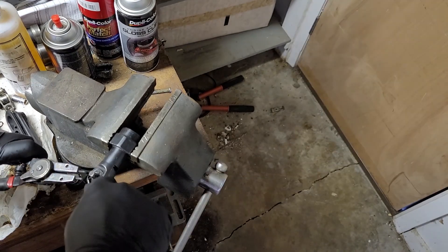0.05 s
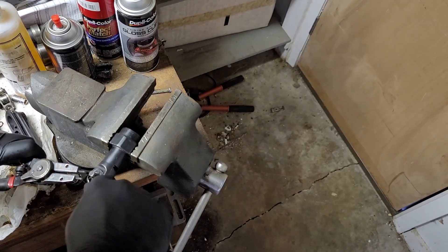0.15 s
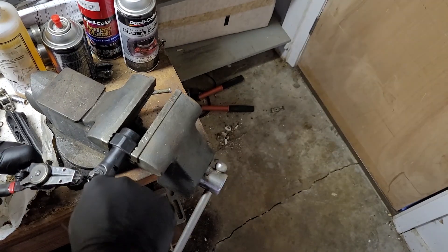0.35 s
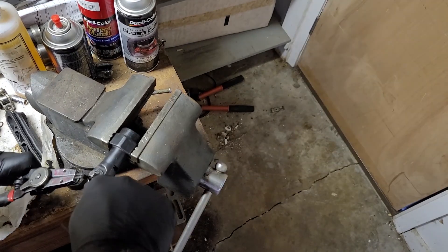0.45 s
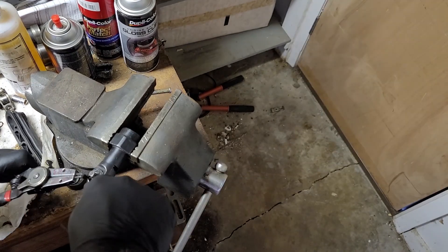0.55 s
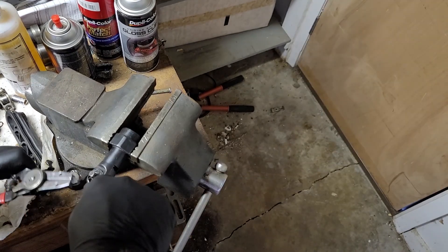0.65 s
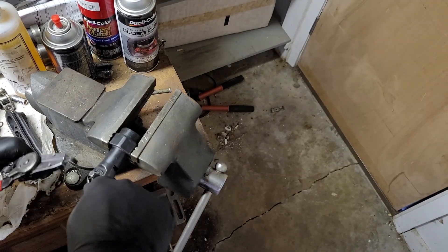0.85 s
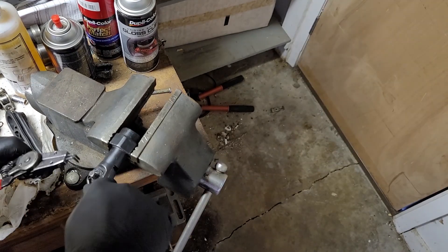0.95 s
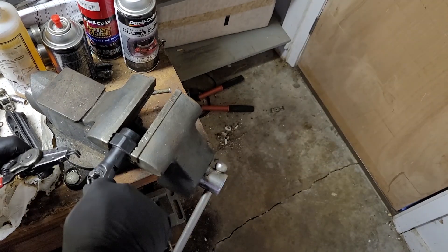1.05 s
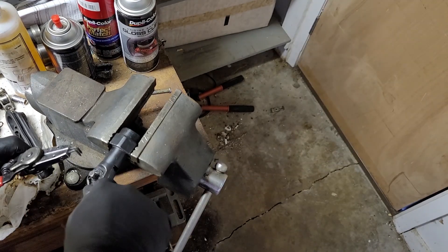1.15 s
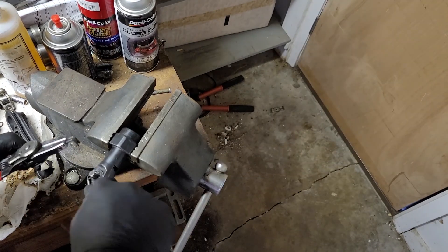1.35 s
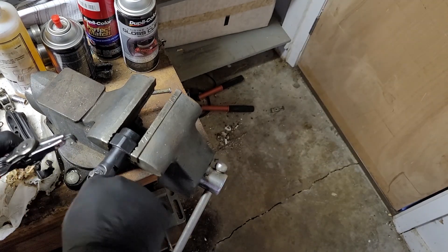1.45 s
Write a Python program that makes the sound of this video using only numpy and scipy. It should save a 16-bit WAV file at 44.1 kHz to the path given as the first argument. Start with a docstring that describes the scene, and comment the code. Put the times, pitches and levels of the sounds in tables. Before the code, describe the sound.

Locking pliers snap open at a bench vise: two bright, close steel clicks with a woody bench thump, short rattle and small garage reverb, then faint handling knocks over low room rumble, close stereo microphone.

```python
"""Locking pliers snap open beside a bench vise in a small garage: two sharp steel clicks, 54 ms apart.
Each sums a damped-sine crack, ringing steel modes, a bench thump and decaying noise for scatter and room.
The parts rebound in short noise spits and pushes, and loose things rattle in nine fading noise bursts.
Soft thuds, knocks, ticks and a breath-like puff follow, as enveloped sines, bench modes and coloured noise.
Underneath lie a low rumble, a faint hiss and a wavering hum of narrow-band noise."""
import sys
import numpy as np
from scipy import signal
from scipy.fft import irfft
from scipy.io import wavfile

SR = 44100
rng = np.random.default_rng(int(sys.argv[2]) if len(sys.argv) > 2 else 0)


def unload_wav(signal):
    """Save mono or channel-first audio to the path in sys.argv[1] as 16-bit WAV at rate SR, clipped to [-1, 1]."""
    wavfile.write(
        sys.argv[1],
        SR,
        np.round(np.clip(np.atleast_2d(signal).T, -1, 1) * 32767).astype(np.int16),
    )


N = 66150  # samples: 1.5 s


def amp(db):
    """Level to gain: 20 dB is a factor of ten in amplitude."""
    return 10 ** (np.asarray(db) / 20)


def unit(x):
    """Normalization: scales a signal to an rms value of 1."""
    return x / np.sqrt(np.mean(abs(x) ** 2) + 1e-20)


def read(points, hz):
    """Linear interpolation of a table along a logarithmic frequency axis."""
    f, value = np.transpose(points)
    return np.interp(np.log(hz + 1), np.log(f + 1), value)


def add(mix, s, sound):
    """Superposition: adds a stereo sound to the mix from time s."""
    part = mix[:, max(round(s * SR), 0):][:, :sound.shape[1]]
    part += sound[:, :part.shape[1]]


def clock():
    """Sampling: the time of every sample, in seconds."""
    return np.arange(N) / SR


def bins():
    """Discrete spectrum: the frequency of every bin, in Hz."""
    return np.fft.rfftfreq(N, 1 / SR)


def fade(t, t60):
    """Exponential decay: the level falls 60 dB in t60 seconds."""
    return np.exp(-np.log(1000) * t / t60)


def burst(rise_s, t60):
    """Impulsive envelope: a linear rise, then exponential decay."""
    t = clock()
    return np.minimum(t / rise_s, 1) * fade(np.maximum(t - rise_s, 0), t60)


# left-right likeness of diffuse sound [f/Hz, correlation before limiting to +-0.99]
DIFFUSE_CORRELATION = [(60, -1), (150, 1.8), (300, 0.63), (640, -0.71), (1300, -0.51), (2800, 0.02),
                       (7000, 0), (15000, -0.05)]


def noise(colour_db, correlation=DIFFUSE_CORRELATION, lean_db=0):
    """Random-phase synthesis: coloured stereo noise whose likeness is set by its mid and side."""
    mid, side = np.exp(2j * np.pi * rng.random((2, len(colour_db))))
    same = np.clip(read(correlation, bins()), -.99, .99)
    mid = mid * np.sqrt(1 + same)
    side = side * np.sqrt(1 - same)
    left = (mid + side) * amp(lean_db / 2)
    right = (mid - side) * amp(-lean_db / 2)
    return unit(irfft(np.array([left, right]) * amp(colour_db), N))


# quickly damped resonances of the contact [f/Hz, level/dB before tilt, time to peak t/s]
CONTACT_MODES = [(1400, -15, .0008), (2800, -9, .0005), (3800, -1, .00065), (4700, -8, .00045),
                 (7400, -7, .0009), (9300, -8, .0005), (10800, -3, .0008), (12200, -12, .0005),
                 (15000, -16, .0006)]
RIGHT_LAG_S, CRACK_RIGHT_DB = .0003, -1.5


def crack(tilt_db):
    """Impact excitation: brief damped resonances, reaching the right microphone a little later."""
    t = np.maximum(clock()[:SR // 100] - np.array([[0], [RIGHT_LAG_S]]), 0)
    centre = np.mean([row[0] for row in CONTACT_MODES])
    out = 0
    for hz, db, peak_s in CONTACT_MODES:
        envelope = (t / peak_s * np.exp(1 - t / peak_s)) ** 3
        tilted_db = db + tilt_db * np.log2(hz / centre)  # tilt in dB per octave
        out = out + amp(tilted_db) * envelope * np.sin(2 * np.pi * hz * t)
    return out * amp([[0], [CRACK_RIGHT_DB]])


MODE_LAG_TURNS, MODE_STRAY_TURNS = 0.18, .1  # right channel's phase lag and its random spread


def ring(modes, spot, right_db):
    """Modal superposition: decaying sines weighted by the struck spot, lagging in phase at the right."""
    t = clock()
    out = np.zeros((2, N))
    random_turns = rng.uniform(-1, 1, (len(modes), 2))
    for (hz, *spot_db, t60), (start, stray) in zip(modes, random_turns):
        lag = np.array([[0], [MODE_LAG_TURNS + MODE_STRAY_TURNS * stray]])
        out += amp(spot_db[spot]) * fade(t, t60) * np.sin(2 * np.pi * (hz * t + start - lag))
    return out * amp([[0], [right_db]])


# ringing modes of the steel [f/Hz, level/dB at the first snap's spot, level/dB at the second's, t60/s]
STEEL_MODES = [(3680, -4, -12, 0.17), (4086, 9.5, -14.5, .14), (4320, -5, 0.5, .18), (4457, -4, -6, .2),
               (4630, -7.5, -1, 0.18), (5663, -3, 0, .14), (6200, -11.5, 3.5, .1), (6490, -5, 10, .14),
               (6850, -5.5, 3, .13), (7170, -7, -8, 0.091), (7564, -14, -14, .14), (9800, -12, 8.5, 0.16),
               (10090, 2.5, 3, 0.11), (10910, -2.5, 2.5, .11)]


def steel_ring(spot):
    """Free vibration of the steel: each spot favours its own modes; the right is 1 dB weaker."""
    return ring(STEEL_MODES, spot, -1)


RIPPLE_DB, RIPPLE_HZ = 3.2, 70  # depth, spacing


def ripple():
    """Modal density: the steel's many weaker resonances as an irregular ripple above 1500 Hz, in dB."""
    hz = np.arange(0, SR, RIPPLE_HZ)
    depth = RIPPLE_DB * np.clip(rng.standard_normal(len(hz)), -2, 2)
    return np.interp(bins(), hz, depth) * (bins() > 1500)


# reflections off the vise and the clutter, relative spectrum [f/Hz, level/dB per Hz]
SCATTER_COLOUR = [(100, -40), (1500, -15.5), (2200, -11.5), (3200, -8.5), (4200, 3), (5200, -2), (6500, 0),
                  (8600, -9.5), (10500, -3.5), (12300, -9.5), (13700, -17.5), (15200, -15), (17000, -20.5)]
# left level over right, shared by scatter and thump [f/Hz, level/dB]
LEAN_LEFT = [(100, -10), (500, 4.5), (1100, -1), (2100, 1.5), (3300, 2.5), (6200, -6.5), (8500, -2.5),
             (10800, -1.5), (12300, -2.5), (14000, 1.5)]
SCATTER_RISE_S, SCATTER_T60_S = 0.0049, 0.13


def scatter(steel_db):
    """Scattering: dense early reflections merge into coloured noise that rises and decays."""
    colour_db = read(SCATTER_COLOUR, bins()) + steel_db
    return noise(colour_db, lean_db=read(LEAN_LEFT, bins())) * burst(SCATTER_RISE_S, SCATTER_T60_S)


# the wooden bench, relative spectrum [f/Hz, level/dB per Hz]
BENCH_COLOUR = [(40, -38.5), (130, -21.5), (290, -6.5), (430, -9), (680, 1.5), (900, -2), (1230, -3),
                (1550, -12.5), (2000, -21), (5000, -49)]
BENCH_RISE_S, THUMP_MODE_DB, THUMP_MODE_T60_S = 0.0024, -7, .13


def thump(hz, t60):
    """Forced response of the bench: noise stands for many short modes, a sine for one stronger one."""
    wood = noise(read(BENCH_COLOUR, bins()), lean_db=read(LEAN_LEFT, bins())) * burst(BENCH_RISE_S, t60)
    t = clock() - np.array([[0], [1.6 * RIGHT_LAG_S]])  # the sine lags at the right
    mode = np.sin(2 * np.pi * hz * t) * burst(BENCH_RISE_S, THUMP_MODE_T60_S)
    return wood + amp(THUMP_MODE_DB) * mode


# ringing modes of the bench and vise
# [f/Hz, level/dB at the first snap's spot, level/dB at the second's, t60/s]
BENCH_RING_MODES = [(228, -7, -8.5, 0.93), (313.7, 6, -4, .26), (355.5, -8.5, 2, .42),
                    (425.3, -6, 5.5, .27), (458.5, -8.5, -4, .4), (513, 0, 2, 0.18), (602, 5, -1.5, 0.15),
                    (668.2, 3, 6, .2), (766.5, 3.5, -8, .26), (952, 5.5, -6, 0.048),
                    (1078, 1.5, -1.5, 0.29), (1181.4, -3.5, 3, .21), (1295, -4.5, -4, 0.4),
                    (1410, -9, -2.5, .17)]
KNOCK_RISE_S = 0.0025


def bench_ring(spot):
    """Modal build-up: the bench modes grow over a few milliseconds, then decay."""
    return ring(BENCH_RING_MODES, spot, 0) * np.minimum(clock() / KNOCK_RISE_S, 1)


# the garage, relative spectrum [f/Hz, level/dB per Hz]
ROOM_COLOUR = [(50, -22), (140, -2.5), (235, 4.5), (310, 5), (420, 6), (850, 0.5), (1300, 7.5),
               (2000, -5.5), (4200, -6.5), (6300, 1.5), (8500, -9.5), (10300, -5), (13500, -18.5),
               (16000, -20)]
# reverberation time [f/Hz, t60/s]
ROOM_DECAY = [(100, .75), (300, .65), (1000, .42), (4000, .35), (8000, .28), (15000, .21)]
ROOM_RISE_S, ROOM_DB = .014, 3  # this gain adds to each snap's room level


def room(steel_db):
    """Reverberation: a diffuse tail whose decay time shortens with frequency."""
    diffuse = noise(read(ROOM_COLOUR, bins()) + steel_db)
    hz, t, z = signal.stft(diffuse, SR, nperseg=256)
    decayed = z * fade(t, read(ROOM_DECAY, hz)[:, None])
    tail = signal.istft(decayed, SR, nperseg=256)[1][:, :N]
    return amp(ROOM_DB) * tail * np.minimum(clock() / ROOM_RISE_S, 1)


# the two snaps [t/s, crack level/dB, crack tilt/dB per octave, steel ring level/dB, scatter level/dB,
# thump level/dB, thump f/Hz, thump t60/s, bench ring level/dB, room level/dB before the room gain]
SNAP_EVENTS = [(.2083, -8, -.5, -31, -17.5, -16.5, 660, .08, -40, -33.5),
               (.2627, -14, 3, -39, -23, -21, 435, .14, -35.5, -30)]
BENCH_DELAY_S = .0015


def snaps():
    """Source and paths: each crack excites steel, clutter and room, and the bench a little later."""
    out = np.zeros((2, N))
    steel_db = ripple()  # both snaps share the same steel
    for spot, row in enumerate(SNAP_EVENTS):
        s, crack_db, tilt_db, ring_db, scatter_db, thump_db, hz, t60, bench_db, room_db = row
        add(out, s, amp(crack_db) * crack(tilt_db))
        add(out, s, amp(ring_db) * steel_ring(spot))
        add(out, s, amp(scatter_db) * scatter(steel_db))
        add(out, s, amp(room_db) * room(steel_db))
        add(out, s + BENCH_DELAY_S, amp(thump_db) * thump(hz, t60))
        add(out, s + BENCH_DELAY_S, amp(bench_db) * bench_ring(spot))
    return out


# rebounds just after the snaps [t/s, steel level/dB, push level/dB]
REBOUND_EVENTS = [(.2136, -16.5, -32), (.2182, -25, -15), (.2236, -20, -15), (.2662, -21, -24),
                  (.2684, -17, -22), (.2708, -21, -30), (.2790, -25, -25)]
# their relative spectrum [f/Hz, level/dB per Hz]
REBOUND_COLOUR = [(500, -31), (2500, -10), (4200, -3), (6200, 1.5), (8300, -7), (10300, -1.5),
                  (12300, -8.5), (13700, -18), (16000, -16)]
REBOUND_RISE_S, REBOUND_T60_S, PUSH_HZ, PUSH_T60_S = .0005, .009, 650, .009


def rebounds():
    """Repeated impact: each renewed contact is a noise spit of steel and a short sine push on the bench."""
    out = np.zeros((2, N))
    for s, steel_db, push_db in REBOUND_EVENTS:
        spit = noise(read(REBOUND_COLOUR, bins())) * burst(REBOUND_RISE_S, REBOUND_T60_S)
        push = np.sin(2 * np.pi * PUSH_HZ * clock()) * burst(REBOUND_RISE_S, PUSH_T60_S)
        add(out, s, amp(steel_db) * spit + amp(push_db) * push)
    return out


# soft thuds as the bench takes the recoil and settles [t/s, f/Hz, level/dB, t60/s]
THUD_EVENTS = [(.234, 140, -34.5, .08), (.396, 680, -41, .09), (.399, 226, -45, .25), (.509, 222, -51, .25)]


def thuds():
    """Damped oscillation: each thud is one low bench mode, alike in both channels."""
    out = np.zeros((2, N))
    for s, hz, db, t60 in THUD_EVENTS:
        add(out, s, amp(db) * burst(KNOCK_RISE_S, t60) * np.sin(2 * np.pi * hz * clock())[None])
    return out


# loose things rattling on the bench, relative spectrum [f/Hz, level/dB per Hz]
RATTLE_COLOUR = [(100, -25), (250, -6), (430, -1), (560, -5), (720, 2), (880, -10), (1100, -2), (1400, -2),
                 (1800, -16), (6000, -22), (9000, -36), (14000, -55)]
RATTLE_COUNT, RATTLE_START_S, RATTLE_GAP_S = 9, .295, .016
RATTLE_DB, RATTLE_FALL_DB_PER_S, RATTLE_SPREAD_DB = -33, 100, 3
TICK_RISE_S, RATTLE_T60_S = 0.0021, 0.043


def rattle():
    """Dissipation: loose things chatter in uneven noise bursts that weaken as they settle."""
    out = np.zeros((2, N))
    for k, (late, size) in enumerate(rng.uniform(-1, 1, (RATTLE_COUNT, 2))):
        t = (k + late / 2) * RATTLE_GAP_S
        db = RATTLE_DB - RATTLE_FALL_DB_PER_S * t + RATTLE_SPREAD_DB * size
        clack = noise(read(RATTLE_COLOUR, bins())) * burst(TICK_RISE_S, RATTLE_T60_S)
        add(out, RATTLE_START_S + t, amp(db) * clack)
    return out


# soft knocks on the bench [t/s, level/dB]
KNOCK_EVENTS = [(0.397, -47), (0.507, -52), (0.868, -56), (1.297, -45), (1.392, -57), (1.444, -63)]
# their relative spectrum [f/Hz, level/dB per Hz]
KNOCK_COLOUR = [(50, -36), (210, -6), (300, -2), (420, 4), (540, -5), (680, 4.5), (850, -16), (1050, -4),
                (1300, -5), (1800, -33), (5000, -35), (12000, -62)]
KNOCK_T60_S, KNOCK_RING_DB = 0.21, -16.5  # ring level relative to the push


def knocks():
    """Soft impact: handling pushes the bench with dull noise and rings its modes at the second spot."""
    out = np.zeros((2, N))
    for s, db in KNOCK_EVENTS:
        push = noise(read(KNOCK_COLOUR, bins())) * burst(KNOCK_RISE_S, KNOCK_T60_S)
        add(out, s, amp(db) * (push + amp(KNOCK_RING_DB) * bench_ring(-1)))
    return out


# light ticks, and at .872 s a faint airy puff like a breath
# [t/s, level/dB, centre f/Hz, half-width/octaves at -6 dB, t60/s]
TICK_AND_PUFF_EVENTS = [(.868, -61.5, 1650, .22, .16), (.872, -67, 2350, .2, .28),
                        (1.261, -60, 2200, .25, .06), (1.262, -64, 3300, .6, .06),
                        (1.297, -64, 3600, .45, .15), (1.299, -68, 6600, .14, .13),
                        (1.441, -68, 5200, .6, .3), (1.470, -66, 3200, .4, .2)]


def ticks_and_puff():
    """Band-limited noise: light ticks and one airy puff, each a decaying burst around one frequency."""
    out = np.zeros((2, N))
    for s, db, hz, octaves, t60 in TICK_AND_PUFF_EVENTS:
        distance = np.log2((bins() + 1) / hz) / octaves
        colour_db = -20 * np.log10(1 + distance ** 4)
        add(out, s, amp(db) * noise(colour_db) * burst(TICK_RISE_S, t60))
    return out


# hum components [f/Hz, level/dB, half-width/Hz at -9.5 dB]
HUM_BANDS = [(75.1, -53, 12), (226.14, -69, 11), (473, -69, 7)]
# left-right likeness of the background [f/Hz, correlation]
AIR_CORRELATION = [(30, 0.79), (150, .92), (500, 0.052), (1500, 0.83), (12000, 0.17)]


def hum():
    """Narrow-band noise: the small bandwidth makes each low tone waver in level and phase."""
    out = np.zeros((2, N))
    for hz, db, width in HUM_BANDS:
        colour_db = -20 * np.log10(1 + ((bins() - hz) / width) ** 2 * 2)
        out += amp(db) * noise(colour_db, AIR_CORRELATION)
    return out


# low rumble, relative spectrum [f/Hz, level/dB per Hz]
RUMBLE_COLOUR = [(20, -5), (45, -5), (75, -3), (110, -13), (180, -16), (300, -17), (450, -17), (650, -25),
                 (1000, -38), (2000, -70)]
# faint hiss, relative spectrum [f/Hz, level/dB per Hz]
HISS_COLOUR = [(400, -20), (800, -3), (1400, -5.5), (1800, -10), (3000, -12), (7000, -14.5), (7900, -26),
               (12300, -29), (13200, -42), (16000, -45)]
RUMBLE_DB, HISS_DB = -56, -72.3


def air():
    """Stationary noise: quiet room air as a low rumble and a faint hiss."""
    rumble = amp(RUMBLE_DB) * noise(read(RUMBLE_COLOUR, bins()), AIR_CORRELATION)
    hiss = amp(HISS_DB) * noise(read(HISS_COLOUR, bins()), AIR_CORRELATION)
    return rumble + hiss


def scene():
    """Superposition: the snaps, what they shake, the soft sounds after them and the quiet garage."""
    shaken = rebounds() + thuds() + rattle()
    soft_sounds = knocks() + ticks_and_puff()
    return snaps() + shaken + soft_sounds + hum() + air()


CUTOFF_HZ = 16000


def record(dry):
    """Band limitation: a linear-phase low-pass filter sets the recorder's upper limit."""
    lowpass = signal.firwin(255, CUTOFF_HZ, window=("kaiser", 9), fs=SR)
    return signal.oaconvolve(dry, lowpass[None], "same")


dry = scene()
out = record(dry)
unload_wav(out)
```